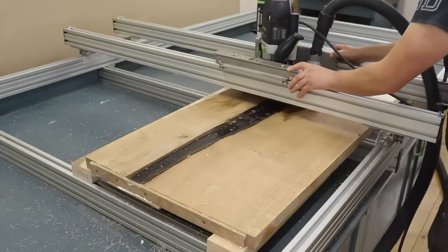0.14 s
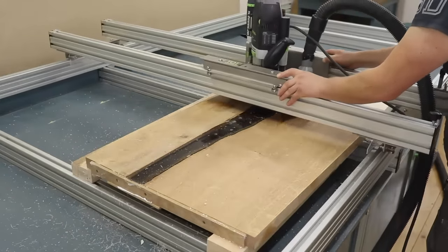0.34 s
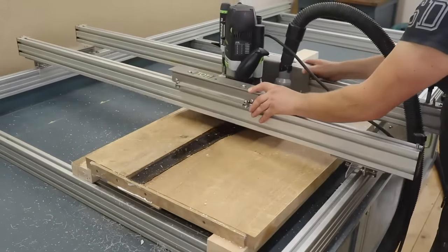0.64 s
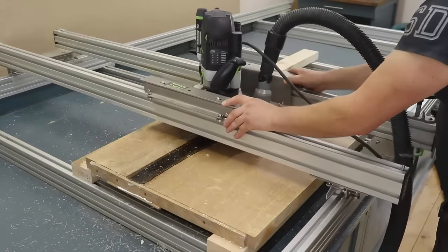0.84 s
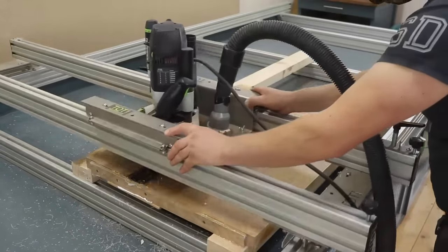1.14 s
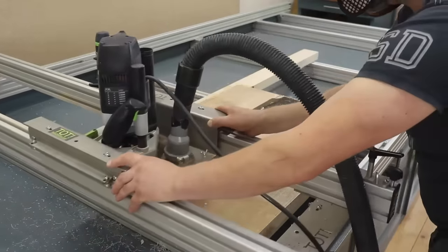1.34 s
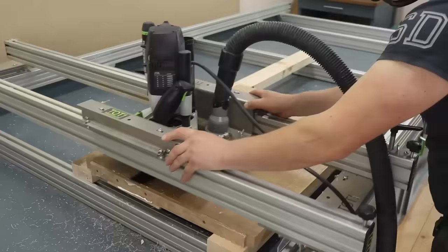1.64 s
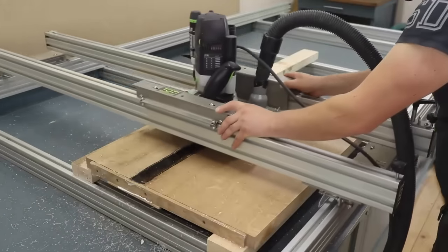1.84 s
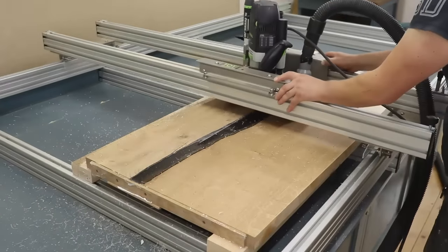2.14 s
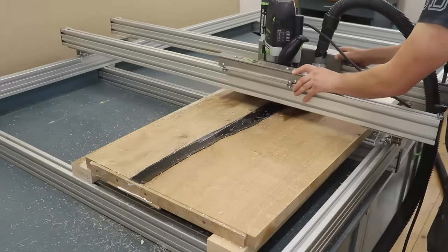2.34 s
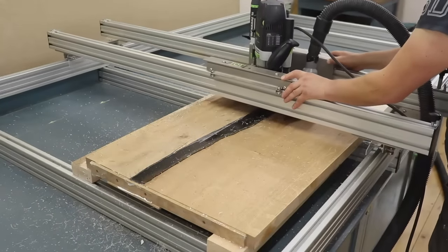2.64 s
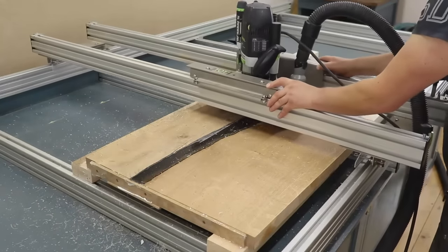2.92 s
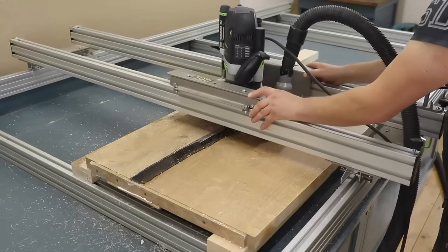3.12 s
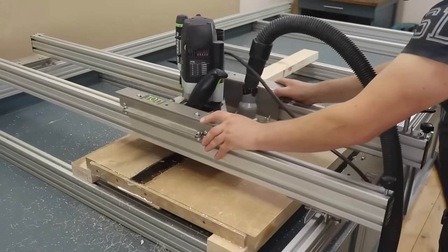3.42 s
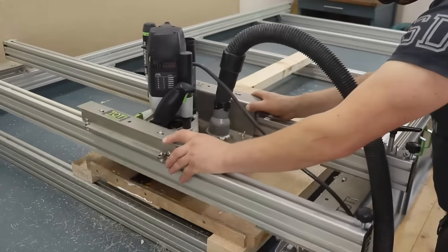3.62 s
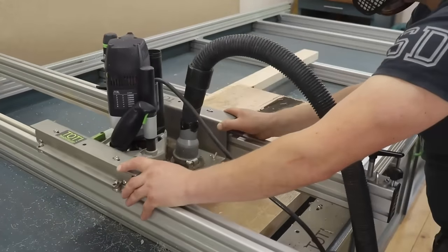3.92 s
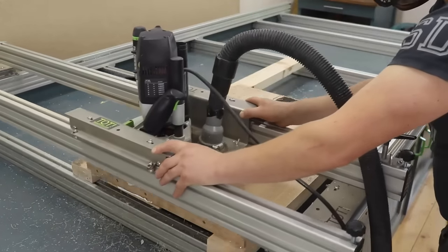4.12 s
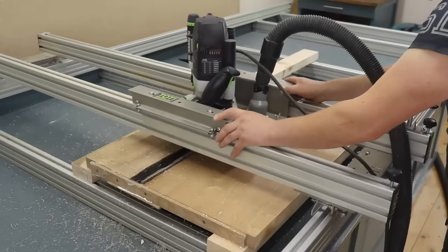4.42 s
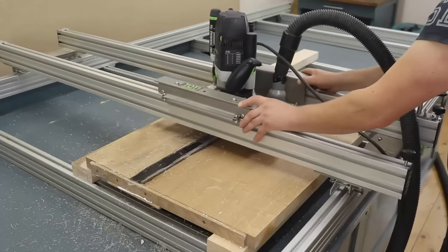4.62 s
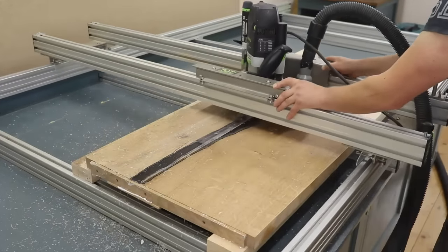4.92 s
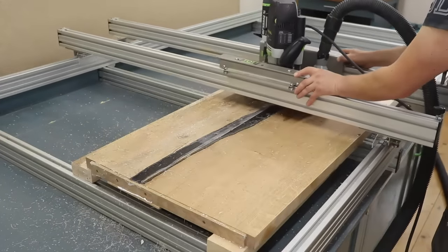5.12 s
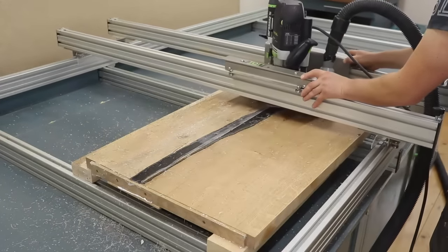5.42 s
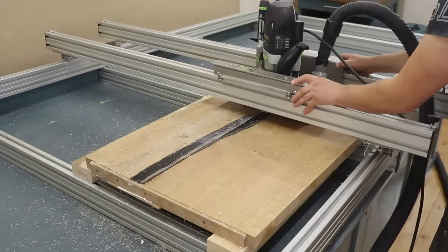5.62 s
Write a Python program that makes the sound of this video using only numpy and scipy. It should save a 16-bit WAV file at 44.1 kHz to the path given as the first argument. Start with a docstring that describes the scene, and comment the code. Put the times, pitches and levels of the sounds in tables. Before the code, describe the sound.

Piercing router whine with brief shrieks wavers through two passes over wood, amid constant airy hiss and a droning suction hose.

```python
"""A router on an aluminium sled makes two strokes over a wooden slab in a workshop, beside a steady extractor.
It starts towards the far end with shrieks, comes near at 1.45 s, recedes, and is near again at 3.95 s.
Its whine, a harmonic series, sags under load and overshoots when the cutter runs free, most at 2.45 and 5.37 s;
single partials flare up, the last shrieks following at about 5.4 and 5.5 s.
Throughout, filtered noise makes the hiss of cooling air and chips and the rush, drone and boom of suction."""
import sys
import numpy as np
from scipy import signal
from scipy.fft import rfft, irfft, next_fast_len
from scipy.io import wavfile
from scipy.ndimage import uniform_filter1d

SR = 44100
rng = np.random.default_rng(int(sys.argv[2]) if len(sys.argv) > 2 else 0)


def file_out(sig):
    """Save sig as 16-bit WAV at sys.argv[1]."""
    # one column per channel
    cols = np.atleast_2d(sig).T
    # limit, then scale
    lim = np.clip(cols, -1, 1)
    pcm = np.round(lim * 32767).astype(np.int16)
    wavfile.write(sys.argv[1], SR, pcm)


N = 254016  # samples

# Extractor motor harmonics. Each row: multiple of its turning rate, level in dB.
EXTRACTOR = [(2, -68.5), (3, -70.5), (4, -55), (6, -59.5), (7, -56), (8, -54)]
EXTRACTOR_HZ = 255.1
# Spectrum of the extractor's steady rush. Each row: frequency in Hz, relative density in dB.
EXHAUST = [(25, -42), (100, -35), (170, -20.5), (280, -19.5), (340, -12), (480, -11.5), (850, -16.5),
           (1100, -10), (2000, -3), (5000, -10)]
# Spectrum of suction at the hood. Each row: frequency in Hz, relative density in dB.
SUCTION = [(100, -40), (200, -20), (290, -14), (500, -10), (620, -0.5), (700, 2.5), (950, 3), (1400, 5.5),
           (2500, -23.5), (5000, -15.5)]
# Rush of air into the hood. Each row: time in seconds, level in dB before a fixed lift.
SUCTION_LEVEL = [(0.0, -52), (0.24, -53), (0.3, -62), (0.5, -58), (0.64, -61.5), (1.44, -50.5), (1.62, -64),
                 (1.7, -54), (1.89, -48.5), (2.42, -57), (2.55, -65), (2.69, -61), (2.98, -63.5),
                 (3.53, -51.5), (4.23, -58.5), (4.27, -55), (5.2, -56), (5.36, -63), (5.74, -61),
                 (5.76, -54)]
SUCTION_MEAN_DB = -55  # reference on the scale of SUCTION_LEVEL
# Resonances of the hose. Each row: centre in Hz, width in Hz of either of two passes, relative gain in dB.
HOSE = [(339.6, 22, 2), (397.6, 59, 1), (433, 19, -5)]
# Drone of the hose. Each row: time in seconds, level in dB before a small fixed trim.
HOSE_LEVEL = [(0.0, -76), (0.05, -51), (0.42, -70), (0.46, -62.5), (1.47, -55), (1.62, -73), (1.68, -53),
              (2.31, -54), (2.57, -73), (2.65, -66), (2.73, -70.5), (3.91, -54.5), (4.12, -70), (4.3, -52),
              (4.52, -60), (5.08, -57), (5.52, -68.5), (5.76, -71)]
# Boom: dB at the far end, dB gained at the near end, dB per dB of suction.
BOOM_DB, BOOM_NEAR_DB, BOOM_FOLLOWS = -83, 8, 0.75
# Spectrum of cooling air and chips. Each row: frequency in Hz, relative density in dB.
HISS = [(700, -42), (1100, -14), (2000, -12.5), (2500, -7.5), (3400, -2.5), (4000, -2), (4700, 1),
        (5500, -3.5), (6500, -7.5), (9000, -7), (11500, -8.5), (13300, -5), (14500, -7.5), (16000, -6.5)]
HISS_DB, HISS_NEAR_DB = -29, 1.4  # dB at the far end, dB gained at the near end
# Two strokes of the sled. Each row: time in seconds, nearness from 0 (far end) to 1 (near end).
SLED = [(0, 0.28), (.3, 0.013), (1, 0), (1.45, 1), (2.25, 0.19), (2.6, 0.067), (3, 0.18), (3.95, 1),
        (4.5, 0.54), (5.25, 0.0092), (5.76, .15)]
# Motor speed. Each row: time in seconds, pitch of the whine in Hz.
SPEED = [(0.0, 1222), (0.21, 1196), (0.29, 1225), (0.48, 1207), (0.54, 1152), (0.69, 1191), (0.75, 1184),
         (0.91, 1212), (1.06, 1196), (1.25, 1213), (1.54, 1202), (1.57, 1240), (2.24, 1158), (2.37, 1186),
         (2.42, 1265), (2.45, 1280), (2.63, 1220), (2.69, 1163), (2.79, 1188), (3.17, 1205), (3.26, 1220),
         (3.9, 1201), (3.96, 1213), (4.25, 1176), (4.33, 1201), (4.4, 1182), (4.57, 1212), (5.12, 1187),
         (5.25, 1169), (5.37, 1267), (5.47, 1238), (5.53, 1187), (5.58, 1175), (5.76, 1198)]
CRUISE_HZ = 1200  # pitch at which the sag is zero
# Lowest partial. Each row: time in seconds, level in dB before a small fixed trim.
FUNDAMENTAL = [(0.0, -36), (0.16, -41.5), (0.35, -31.5), (0.62, -35), (0.67, -46.5), (1.15, -36.5),
               (1.62, -47), (1.91, -33), (1.99, -48.5), (2.18, -38), (2.6, -37), (2.71, -29), (3.08, -49),
               (3.29, -33), (3.66, -43.5), (3.79, -36), (4.06, -45), (4.14, -33), (4.46, -41.5),
               (4.59, -51), (4.85, -38.5), (5.08, -49.5), (5.26, -35), (5.39, -41.5), (5.63, -31.5),
               (5.76, -35.5)]
# Partials of the cutter. Each row: multiple of the pitch, level at the far end in dB,
# gain at the near end in dB, gain in dB per % of sag in speed.
PARTIALS = [(2, -42, -2.5, 0.3), (3, -35, -6.5, 0.13), (4, -37.5, -5.5, .5), (5, -41.5, -3.5, 1),
            (6, -38, -5.5, 0.1)]
FADE_DB, FADES_PER_S = 1.47, 9  # each partial wavers in level at random
FLUTTER_DB = 0.4444  # per multiple of the pitch: short waves flutter more
# Single partials flaring above the rest, the loudest as shrieks.
# Each row: time of the peak in seconds, length in seconds, multiple of the pitch, peak level in dB.
FLARES = [(.2, 0.36, 2, -36.5), (0.287, 0.034, 3, -19), (0.35, 0.13, 3, -31), (0.439, 0.03, 3, -19.5),
          (0.542, 0.089, 2, -37), (0.583, 0.21, 3, -33.5), (0.641, 0.024, 4, -25), (0.694, 0.3, 6, -32),
          (0.759, .06, 4, -27), (0.782, .15, 3, -28), (1.05, .1, 3, -33.5), (1.476, 0.094, 4, -30),
          (1.606, 0.064, 3, -19), (2.02, 0.039, 4, -29), (2.19, 0.043, 4, -37), (2.28, 0.27, 6, -30.5),
          (2.333, .06, 2, -38), (2.489, .05, 3, -25), (2.551, .06, 3, -18.5), (2.887, .2, 2, -34),
          (2.9, 0.16, 6, -31.5), (2.965, 0.19, 3, -31), (3.093, 0.13, 4, -30), (3.22, 0.23, 3, -34.5),
          (4.213, .14, 2, -35), (5.04, 0.13, 4, -29), (5.079, 0.34, 3, -33), (5.225, 0.17, 6, -34),
          (5.252, 0.099, 5, -33.5), (5.364, .055, 3, -21), (5.53, 0.1, 3, -23.5), (5.67, 0.18, 2, -37),
          (5.68, 0.083, 5, -32), (5.731, 0.09, 3, -30.5)]
# Faint overtones. Each row: multiple of the pitch, dB relative to their common level.
OVERTONES = [(7, -3), (8, -3), (9, 1), (10, -5.5), (11, -6), (12, -0.5), (13, -7)]
# Common level of the overtones: dB at the far end, dB gained at the near end, dB per % of sag.
SHEEN_DB, SHEEN_NEAR_DB, SHEEN_DB_PER_SAG = -42, -1, 0.5
CUTOFF_HZ = 15750  # upper edge of the recorded band
# Gain control: threshold in dB, share of the excess taken away, response time in seconds.
LIMIT_DB, SQUEEZE, SMOOTH_S = -24, 0.71, 0.005


def from_db(db):
    """Definition of the decibel: 20 dB is a factor of ten in amplitude."""
    return 10 ** (np.asarray(db) / 20)


def rms_one(x):
    """Normalisation to unit mean power."""
    return x / np.sqrt(np.mean(x ** 2) + 1e-20)


def in_time(rows):
    """Linear interpolation: one curve per column, sample by sample."""
    s, *columns = np.transpose(rows)
    return [np.interp(np.arange(N) / SR, s, c) for c in columns]


def drift(rate):
    """Random modulation: noise through two equal low-pass poles at `rate` Hz, with spread 1."""
    step = 40  # samples between computed points
    r = np.exp(-2 * np.pi * rate * step / SR)
    noise = rng.standard_normal(N // step + 2002)
    slow = signal.lfilter([1], [1, -2 * r, r * r], noise)[2000:]  # drop the filter's start
    return np.interp(np.arange(N) / step, np.arange(len(slow)), rms_one(slow))


def air_noise(spectrum, patchy_db, patch_rate, count=22):
    """Turbulence as coloured noise in overlapping bands, each swelling independently; rms 1."""
    hz = np.maximum(np.fft.rfftfreq(N, 1 / SR), 1)
    points, levels = np.transpose(spectrum)
    colour = from_db(np.interp(np.log(hz), np.log(points), levels))
    coloured = rfft(rng.standard_normal(N)) * colour * (hz < CUTOFF_HZ)
    place = np.sqrt(hz / CUTOFF_HZ) * (count - 1)  # bands widen with frequency
    total = np.zeros(N)
    for k in range(count):
        band = irfft(coloured * np.maximum(1 - abs(place - k), 0), N)
        total += band * from_db(patchy_db * drift(patch_rate))
    return rms_one(total)


def resonate(x, hz, width):
    """Resonance of a damped mode: two poles, with gain 1 at the peak."""
    r = np.exp(-np.pi * width / SR)
    poles = [1, -2 * r * np.cos(2 * np.pi * hz / SR), r * r]
    return signal.lfilter(np.array([1, 0, -1]) * (1 - r * r) / 2, poles, x)


def partial(phase, scatter, scatter_rate):
    """Modulation by shifting reflections: a sine of rms 1 with a share smeared into a narrow skirt."""
    skirt = drift(scatter_rate) * np.cos(phase) + drift(scatter_rate) * np.sin(phase)
    return (np.sqrt(2) * np.sin(phase) + scatter * skirt) / np.sqrt(1 + scatter ** 2)


def workshop(x, t60, count=9):
    """Reverberation: feedback echoes of unrelated lengths between walls, falling 60 dB in t60 seconds."""
    size = next_fast_len(N + SR)
    hz = np.fft.rfftfreq(size, 1 / SR)
    response = 0
    for lag in rng.uniform(.011, .045, count):  # seconds
        loop = from_db(-60 * lag / t60) * np.exp(-2j * np.pi * hz * lag)
        response = response + loop / (1 - loop)
    return irfft(rfft(x, size) * response, size)[:N] / np.sqrt(count)


def extractor():
    """Harmonics of a motor that nearly holds its speed, with the broadband turbulence of its exhaust."""
    phase = 2 * np.pi * np.cumsum(EXTRACTOR_HZ * (1 + 0.00073 * drift(3.66))) / SR
    hum = sum(from_db(db) * partial(order * phase, scatter=0.5, scatter_rate=3.1) for order, db in EXTRACTOR)
    return hum + from_db(-46.5) * air_noise(EXHAUST, patchy_db=6.0, patch_rate=8.6, count=14)


def intake():
    """Turbulence exciting resonance: rush at the hood, drone of the hose and a low boom."""
    near, = in_time(SLED)
    suction_db, = in_time(SUCTION_LEVEL)
    hose_db, = in_time(HOSE_LEVEL)
    boom_db = BOOM_DB + BOOM_NEAR_DB * near + BOOM_FOLLOWS * (suction_db - SUCTION_MEAN_DB)
    gusts = drift(31)  # the intake is lumpy, shaking rush and drone together
    rush = air_noise(SUCTION, patchy_db=2.0, patch_rate=6, count=14)
    suction = from_db(suction_db + 5.5 + 1.1 * gusts) * rush
    eddies = rng.standard_normal(N)
    hose = sum(from_db(db) * resonate(resonate(eddies, hz, width), hz, width) for hz, width, db in HOSE)
    drone = from_db(hose_db - .5 + 2.2 * gusts) * rms_one(hose)
    boom = resonate(resonate(eddies, hz=160.4, width=14), hz=162, width=24)
    return suction + drone + from_db(boom_db) * rms_one(boom)


def hiss():
    """Broadband turbulence of cooling air and chips, slightly louder at the near end."""
    near, = in_time(SLED)
    level_db = HISS_DB + HISS_NEAR_DB * near + .5 * drift(70) + 0.64 * drift(3.1)
    return from_db(level_db) * air_noise(HISS, patchy_db=1.03, patch_rate=7)


def swell(s, length):
    """Gaussian envelope of height 1 around s, `length` wide at half height."""
    return 2 ** -((2 * (np.arange(N) / SR - s) / length) ** 2)


def flares():
    """Selective amplitude modulation: the flare amplitude of each of the cutter's partials."""
    return [sum(from_db(db) * swell(s, length) for s, length, k, db in FLARES if k == order)
            for order, *_ in PARTIALS]


def router(flaring):
    """Harmonic series locked to one slightly unsteady shaft; partials gain under load, and high faint ones smear."""
    pitch, = in_time(SPEED)
    near, = in_time(SLED)
    sag = 100 * (1 - pitch / CRUISE_HZ)  # %
    phase = 2 * np.pi * np.cumsum(pitch * (1 + 0.000604 * drift(36))) / SR
    fundamental_db, = in_time(FUNDAMENTAL)
    fundamental = partial(phase, scatter=0.18, scatter_rate=43)
    out = from_db(fundamental_db - 0.24 + .8 * drift(9.9)) * fundamental
    for (order, far_db, near_db, load_db), flare in zip(PARTIALS, flaring):
        waver_db = FADE_DB * drift(FADES_PER_S) + FLUTTER_DB * order * drift(13.4)
        steady = from_db(far_db + near_db * near + load_db * sag + waver_db)
        level = np.hypot(steady, flare)  # powers add
        # where the direct tone fades, reflections take over
        scatter = 0.086 * order * (level / from_db(-32)) ** -.4
        out += level * partial(order * phase, scatter, scatter_rate=25.6)
    sheen_db = SHEEN_DB + SHEEN_NEAR_DB * near + SHEEN_DB_PER_SAG * sag
    for order, db in OVERTONES:
        level = from_db(sheen_db + db + 2.6 * drift(6.2))
        out += level * partial(order * phase, scatter=0.88, scatter_rate=32)
    return out


def scene():
    """Superposition at one microphone, alike in both channels; only the whine is given reverberation."""
    whine = router(flares())
    echoes = from_db(-13.5) * workshop(whine, t60=0.53)
    mono = extractor() + intake() + hiss() + echoes + whine
    return np.array([mono, mono])


def record(dry):
    """Dynamic compression: loud peaks duck the whole sound, and a steep low-pass limits the band."""
    power = uniform_filter1d(dry[0] ** 2, size=441)  # mean over 10 ms
    level_db = 10 * np.log10(power + 1e-12)
    over_db = np.maximum(level_db - LIMIT_DB, 0)
    keep = np.exp(-1 / (SMOOTH_S * SR))
    smooth_over_db = signal.lfilter([1 - keep], [1, -keep], over_db)
    ducked = dry * from_db(-SQUEEZE * smooth_over_db)
    low_pass = signal.ellip(12, .1, 80, CUTOFF_HZ, fs=SR, output="sos")
    return signal.sosfilt(low_pass, ducked)


dry = scene()
out = record(dry)
file_out(out)
```